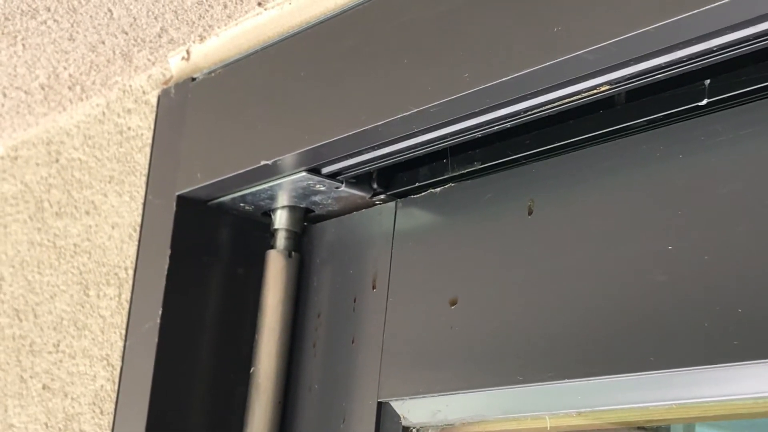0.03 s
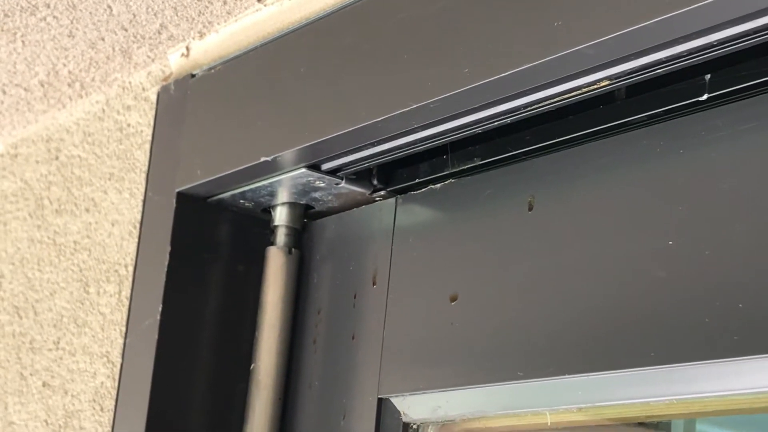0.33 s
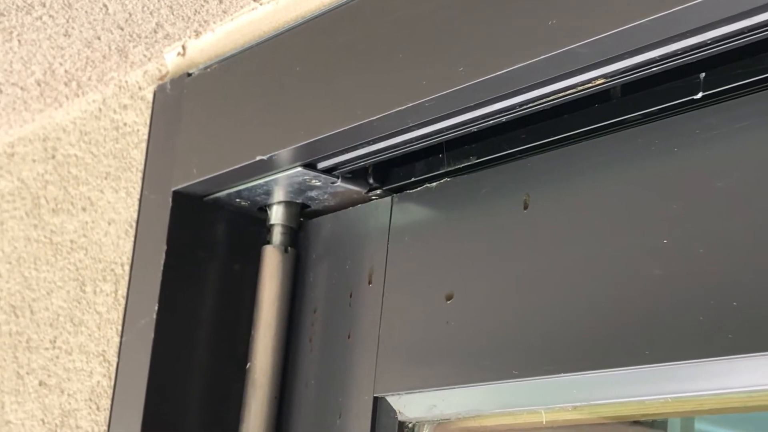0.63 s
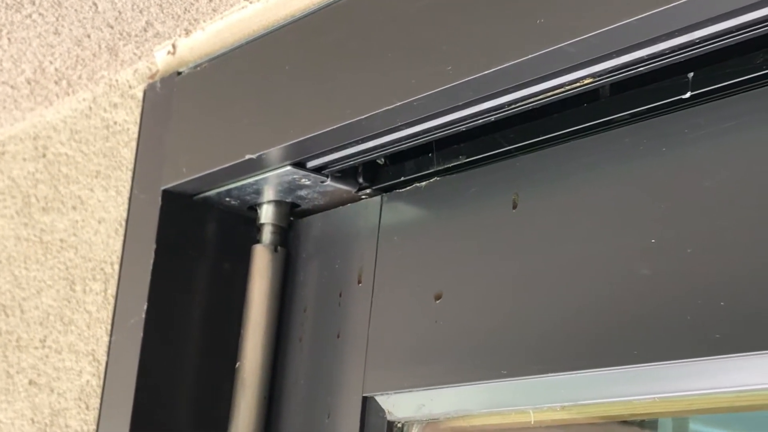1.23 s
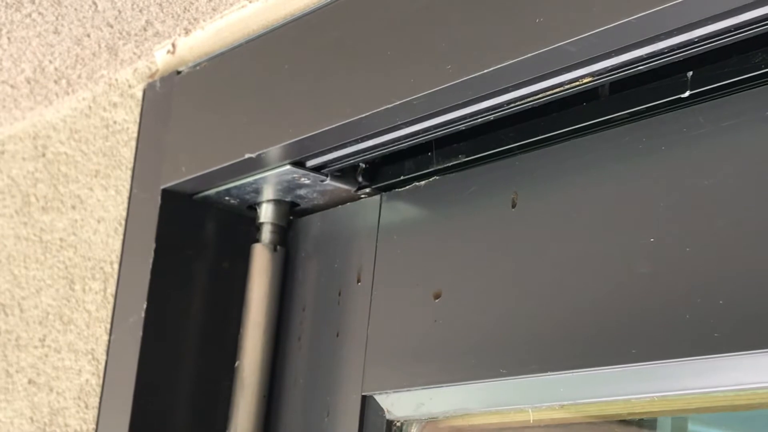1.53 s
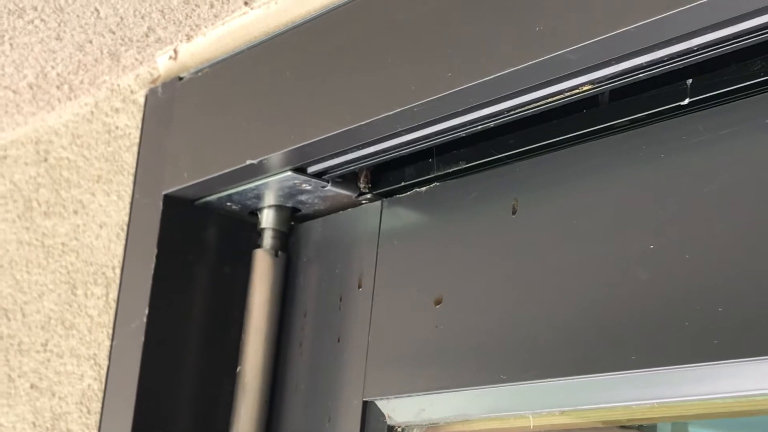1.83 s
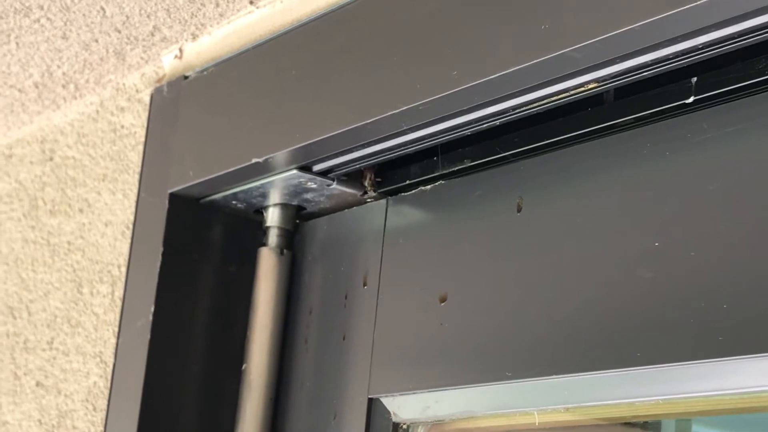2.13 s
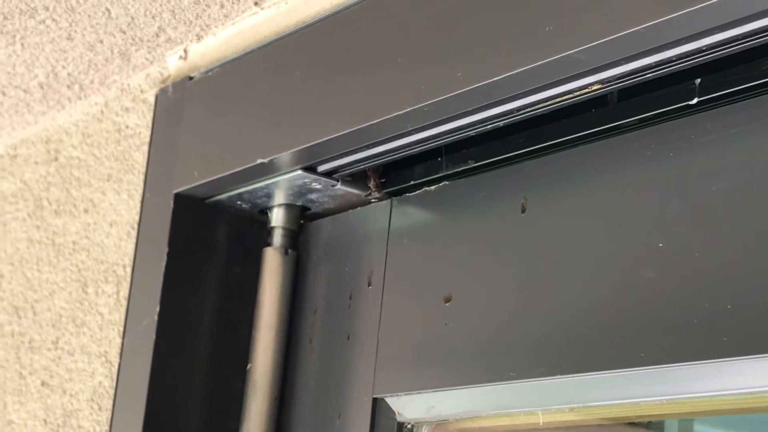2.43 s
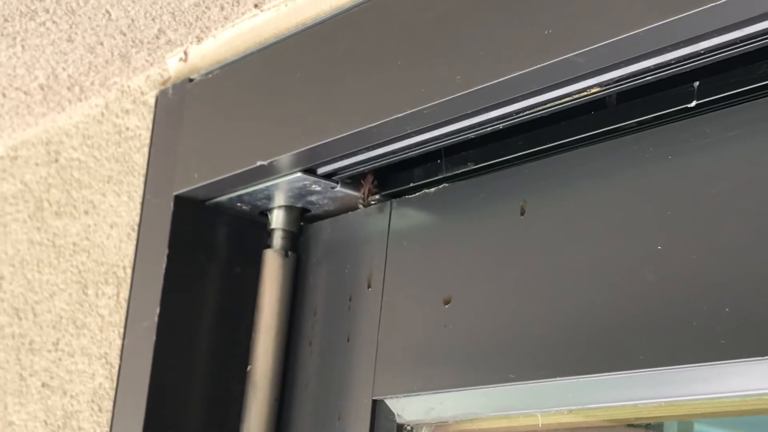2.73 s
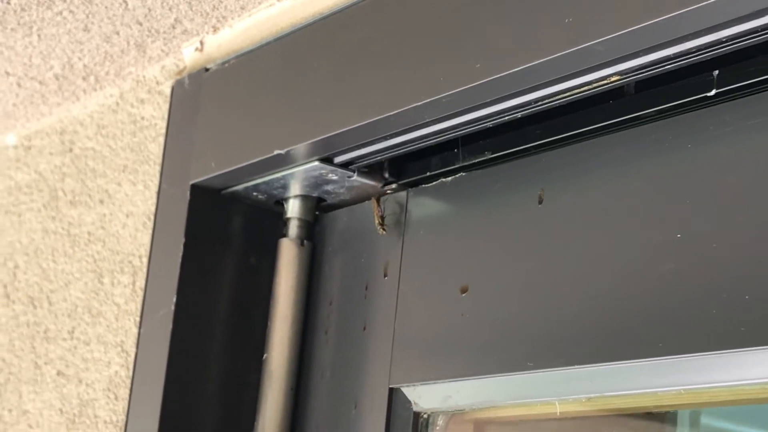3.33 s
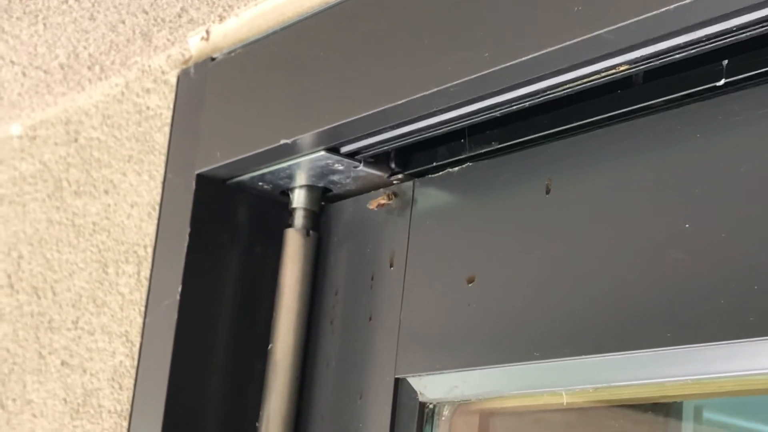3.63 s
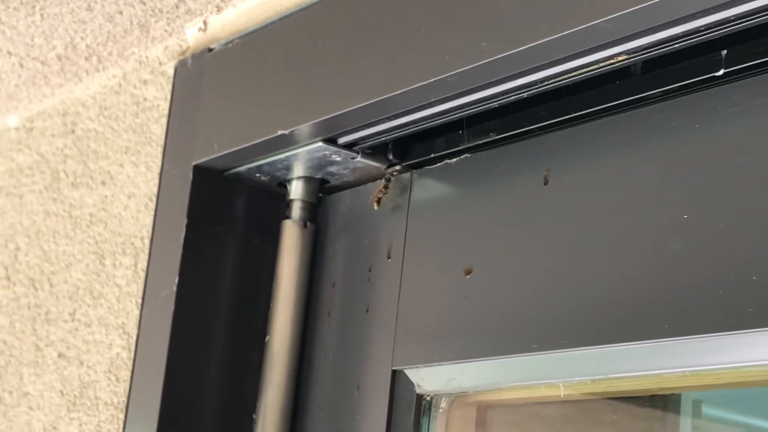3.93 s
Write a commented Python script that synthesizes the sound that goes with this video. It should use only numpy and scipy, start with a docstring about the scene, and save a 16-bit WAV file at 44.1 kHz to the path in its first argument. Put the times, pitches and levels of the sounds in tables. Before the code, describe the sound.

A small bird whistles thin, high, rising chirps outside a building, from about 0.5 to 1.1 seconds and again from 3.3 seconds to the end. Distant traffic rumbles quietly throughout, with droning engines, a wash of tyres, faint hiss and tiny ticks. Just before the first chirp, one hard knock echoes off the walls. Another bird twitters faintly farther off between 1.2 and 1.9 seconds.

```python
"""Outside a building, distant traffic is heard from the start: a rumble, two droning engines and the
steady wash of tyres, with a faint hiss and tiny ticks. Half a second in, something hard is knocked
once, and the walls answer. Right after, a small bird whistles a run of thin, upswept chirps. Another
bird twitters faintly, farther off. Near the end the first bird sings a second run."""
import sys
import numpy as np
from scipy import signal
from scipy.fft import rfft, irfft, next_fast_len
from scipy.io import wavfile
from scipy.ndimage import map_coordinates

SR = 44100
rng = np.random.default_rng(int(sys.argv[2]) if len(sys.argv) > 2 else 0)


def inscribe(sig):
    """Save sig as 16-bit PCM at rate SR to the path in sys.argv[1].

    A 1-D sig is mono; a 2-D sig holds one channel per row.
    Samples are clipped to [-1, 1] before scaling.
    """
    pcm = np.round(np.clip(np.atleast_2d(sig).T, -1, 1) * 32767)
    wavfile.write(sys.argv[1], SR, pcm.astype(np.int16))


N = 176400  # 4 seconds


def amp(db):
    """Turns decibels into a number to multiply a sound by."""
    return 10 ** (np.asarray(db) / 20)


def fade(t, t60):
    """A dying away that loses 60 dB in t60 seconds (the fade time)."""
    return amp(-60 * t / t60)


def along(points, hz):
    """Reads between (frequency, value) points on a logarithmic frequency scale."""
    freqs, values = np.transpose(points)
    return np.interp(np.log(hz + 1), np.log(freqs + 1), values)


def curve(rows):
    """Joins (time, value) points with straight lines, one value per sample."""
    return np.interp(np.arange(N) / SR, *np.transpose(rows))


def wobble(rate):
    """A smooth curve through `rate` random values a second."""
    return map_coordinates(rng.standard_normal(N // 16), [np.arange(N) * rate / SR], mode="wrap")


def filtered(x, response):
    """Scales each frequency in x by response(frequency)."""
    size = next_fast_len(N + SR // 2)
    hz = np.fft.rfftfreq(size, 1 / SR)
    return irfft(rfft(x, size) * response(hz), size)[:N]


def noise(spectrum):
    """Noise shaped by (frequency, level) points, at an average (rms) strength of 1."""
    shaped = filtered(rng.standard_normal(N), lambda hz: amp(along(spectrum, hz)))
    return shaped / np.sqrt(np.mean(shaped ** 2) + 1e-20)


def add(track, s, sound):
    """Mixes a sound into the track at s seconds."""
    part = track[round(s * SR):][:len(sound)]
    part += sound[:len(part)]


def yard(x):
    """Sound lingers between the buildings as a blur of echoes; the highest tones die first."""
    # how long the yard rings: f/Hz, fade time/s
    fade_times = [(200, .45), (2000, 0.81), (8000, 0.43), (14000, 0.1)]
    hz, t, spectrum = signal.stft(rng.standard_normal(SR // 2), SR, nperseg=256)
    spectrum *= fade(t, along(fade_times, hz)[:, None])
    _, tail = signal.istft(spectrum, SR, nperseg=256)
    return signal.fftconvolve(x, tail / np.linalg.norm(tail))


def background():
    """The steady low wash of the town, with a faint hiss and a higher fizz."""
    # tone colour of each noise: f/Hz, level/dB
    town = [(60, -12.5), (120, -1.5), (155, 4.5), (220, -2.5), (310, -5.5), (430, -6), (600, -18.5),
            (1000, -22.5), (3000, -57)]
    hiss = [(500, -5.5), (2500, 2), (3600, 2.5), (4550, 2), (4850, -3), (5400, -2.5), (6500, -6),
            (7600, -12), (9500, -11.5), (15500, -22)]
    fizz = [(2000, -26), (6000, 8), (7700, 1), (9300, 2), (9900, -2.5), (10400, -9.5), (11100, -0.5),
            (13000, 0), (15500, -3.5)]
    # their slow changes in loudness: t/s, level/dB
    hiss_level = [(0, -69), (1, -69), (1.8, -70.5), (2.3, -71), (4, -73)]
    fizz_level = [(0, -77.5), (1.8, -76), (2.5, -74), (4, -75.5)]
    return (amp(-61) * noise(town)
            + amp(curve(hiss_level)) * noise(hiss)
            + amp(curve(fizz_level)) * noise(fizz))


def engine(rows):
    """A far engine: only its slightly unsteady firing tone carries."""
    s, hz, db = np.transpose(rows)
    pitch = curve(np.c_[s, hz]) * (1 + 0.01176 * wobble(rate=11))
    level = amp(curve(np.c_[s, db]) - 0.5 * wobble(rate=6.4))
    return np.sqrt(2) * level * np.sin(2 * np.pi * np.cumsum(pitch) / SR)


def traffic():
    """Two engines drone in a swelling rumble, under the even wash of tyres."""
    # tone colour of the rumble and the tyres: f/Hz, level/dB
    rumble_colour = [(20, -42), (30, -14), (42, 0.5), (52, -4), (70, -1.5), (88, -7), (105, -6),
                     (135, -15.5), (200, -30), (400, -47.5), (1000, -96)]
    tyre_colour = [(100, -16.5), (300, -11), (560, -2.5), (760, -1.5), (1030, 1), (1250, -1.5),
                   (1600, -6.5), (2000, -13), (2700, -20.5), (5000, -30.5), (15000, -42)]
    # their loudness over time: t/s, level/dB
    rumble_level = [(0, -57.5), (.36, -58), (.48, -50), (.7, -58), (1.35, -54.5), (1.8, -50.5), (2.1, -56),
                    (2.55, -50), (2.95, -52), (3.45, -49.5), (3.6, -53.5), (3.8, -48.5), (4, -48)]
    tyre_level = [(0, -62.5), (.4, -61.5), (.9, -59), (2, -59), (3.1, -59), (4, -58.7)]
    # each engine's firing tone: t/s, f/Hz, level/dB
    low_drone = [(0, 62.7, -59), (1.25, 62, -58.5), (1.6, 59, -49.5), (1.85, 58.83, -54), (2.1, 59.14, -53),
                 (2.5, 59.25, -57.5), (2.85, 61.35, -46), (3.15, 62.1, -52.5), (3.35, 60.7, -59),
                 (4, 61, -63)]
    high_drone = [(0, 91, -69), (.5, 89.8, -61), (.7, 90, -61.5), (.9, 88.36, -52), (1.3, 90.3, -62),
                  (1.8, 89.8, -58.5), (2.3, 92, -57), (2.7, 84, -55.5), (3.15, 81.3, -53),
                  (3.45, 75.17, -49.5), (3.65, 75, -62), (4, 78, -69)]
    rumble = amp(curve(rumble_level)) * noise(rumble_colour)
    tyres = amp(curve(tyre_level) + 0.41 * wobble(rate=7.68)) * noise(tyre_colour)
    return rumble + engine(low_drone) + engine(high_drone) + tyres


def ticks():
    """Tiny bursts of noise close by: one faint, dry click and a random scatter of fainter ones."""
    # the clearest click: t/s, level/dB
    clicks = [(1.422, -61)]
    strays_per_s, stray_db, spread_db = 4.6, -73, 9
    out, t = np.zeros(N), np.arange(SR // 10) / SR
    gap_draws, level_draws = rng.random((40, 2)).T
    times = np.cumsum(-np.log(gap_draws)) / strays_per_s
    levels = stray_db + spread_db * (2 * level_draws - 1)
    for s, db in [*clicks, *zip(times, levels)]:
        add(out, s, amp(db) * fade(t, t60=0.014) * rng.standard_normal(len(t)))
    return out


def knock():
    """A hard thing cracks and rings briefly when hit; the walls' duller answer builds up and fades."""
    # the blow: t/s, level/dB
    blows = [(0.4671, -44.5)]
    # the tones the thing rings with: f/Hz, relative level/dB, fade time/s
    tones = [(2133, 7.5, 0.052), (2050, -7, .08), (2610, -7, 0.1), (3145, -17, 0.14), (1470, -8, 0.065)]
    # tone colour of the crack and of the walls' answer: f/Hz, level/dB
    crack_colour = [(200, -20), (900, 0), (1700, -6), (2300, -3), (3300, -2), (4400, -13), (6500, -34),
                    (12000, -50)]
    answer_colour = [(100, -15), (300, -5.5), (600, 4), (800, -1), (920, 10.5), (1100, -0.5), (1750, -8),
                     (2130, 2.5), (2350, -4.5), (2600, -4), (3200, -5), (4400, -17), (6500, -31),
                     (12000, -37)]
    out, t = np.zeros(N), np.arange(N) / SR
    rise = lambda seconds: 1 - np.exp(-t / seconds)
    for s, db in blows:
        ring = sum(amp(level) * fade(t, t60) * np.sin(2 * np.pi * hz * t) for hz, level, t60 in tones)
        crack = amp(-5.5) * fade(t, t60=0.055) * noise(crack_colour)
        add(out, s, amp(db) * rise(seconds=0.0018) * (ring + crack))
        answer = rise(seconds=0.0089) * fade(t, t60=0.4) * noise(answer_colour)
        add(out, s + 0.0055, amp(db - 4) * answer)  # the walls answer a moment later
    return out


def whistle(length, start_hz, end_hz, waver):
    """One thin note that starts softly, slides in pitch and levels off; waver makes the pitch shake."""
    attack_s, release_s, flutter_db = 0.020, 0.011, 2.2
    t = np.arange(int(length * SR)) / SR
    slide = np.clip(1 - t / length, 0, 1) ** 1.8  # a higher power levels off sooner
    hz = end_hz + (start_hz - end_hz) * slide
    hz *= 1 + waver * wobble(rate=430)[:len(t)]
    swell = np.clip(t / attack_s, 0, 1) ** 2 * np.clip((length - t) / release_s, 0, 1)
    flutter = amp(flutter_db * wobble(rate=193)[:len(t)])
    return np.sqrt(2) * swell * flutter * np.sin(2 * np.pi * np.cumsum(hz) / SR)


def far_bird():
    """Lower, shakier notes, heard only as a blur of echoes."""
    # the twitter: t/s, length/s, start f/Hz, end f/Hz, level/dB
    notes = [(1.229, 0.046, 3800, 3620, -79), (1.312, 0.038, 3600, 3680, -74),
             (1.39, 0.079, 3470, 3620, -77), (1.48, 0.0863, 3630, 3570, -76), (1.80, .08, 3590, 3800, -79)]
    out = np.zeros(N)
    for s, length, start_hz, end_hz, db in notes:
        add(out, s, amp(db) * yard(whistle(length, start_hz, end_hz, waver=0.06)))
    return out


def near_bird():
    """Each rising chirp arrives directly, bounces off the nearest walls and lingers in the yard."""
    # two runs of chirps: t/s, length/s, start f/Hz, end f/Hz, level/dB
    chirps = [(0.529, 0.048, 7005, 7720, -68.5), (0.627, 0.054, 6000, 7720, -69.5),
              (0.745, 0.064, 5634, 7160, -68.5), (0.865, 0.052, 5516, 7250, -67.5),
              (0.98, 0.041, 5600, 6780, -65), (1.096, 0.042, 4900, 5760, -67.5),
              (3.316, .049, 7080, 8100, -69), (3.42, .054, 5750, 7600, -76),
              (3.587, 0.053, 6370, 7900, -72.5), (3.778, 0.048, 6550, 8150, -67),
              (3.95, .052, 7000, 7700, -72.5)]
    # echoes off nearby walls: delay/s, relative level/dB
    walls = [(.0031, -16), (.0074, -18), (.0135, -8), (.021, -18), (0.051, -20)]
    out = np.zeros(N)
    for s, length, start_hz, end_hz, db in chirps:
        note = amp(db) * whistle(length, start_hz, end_hz, waver=0.005)
        add(out, s, note)
        add(out, s, amp(-5.5) * yard(note))
        for delay, wall_db in walls:
            add(out, s + delay, amp(wall_db) * note)
    return out


def scene():
    """Mixes all the sounds into one channel."""
    return (background() + near_bird() + far_bird() + knock() + ticks() + traffic())[None]


def record(dry):
    """Cuts off the very highest treble."""
    return filtered(dry[0], lambda hz: hz < 15780)[None]


dry = scene()
out = record(dry)
inscribe(out)
```